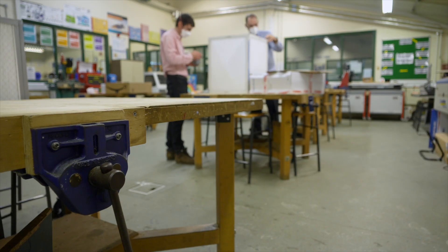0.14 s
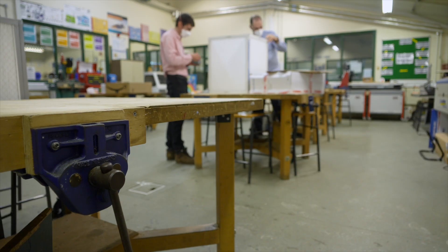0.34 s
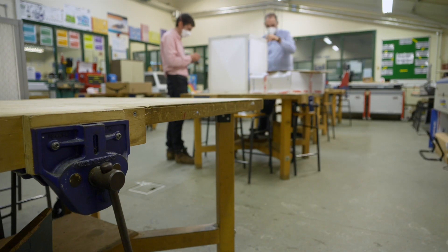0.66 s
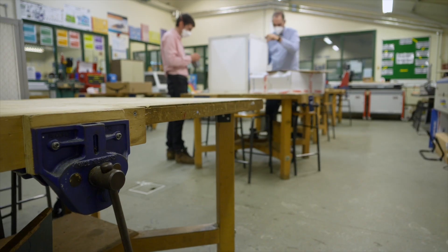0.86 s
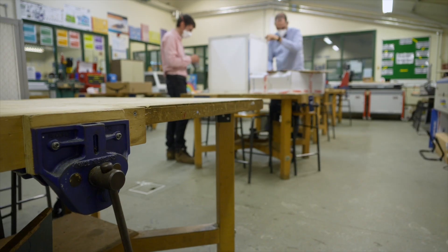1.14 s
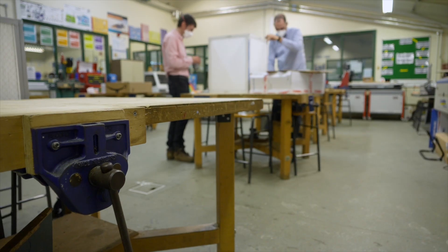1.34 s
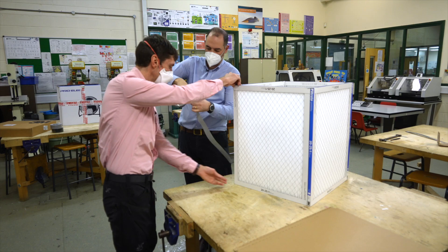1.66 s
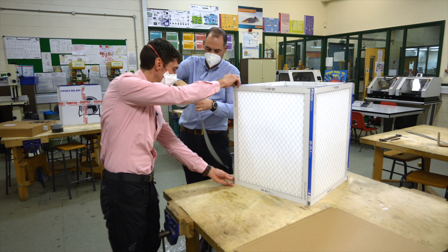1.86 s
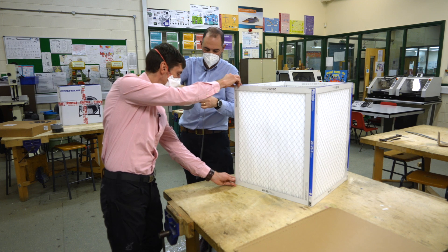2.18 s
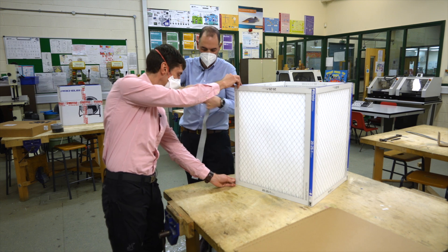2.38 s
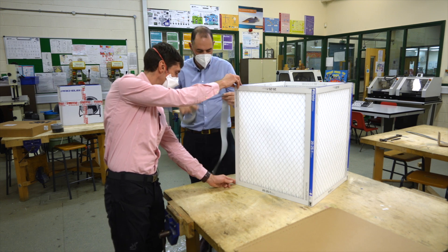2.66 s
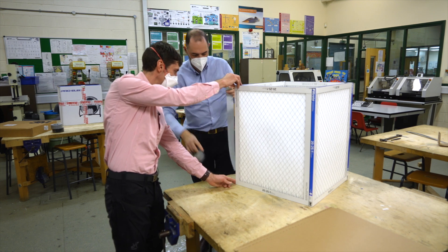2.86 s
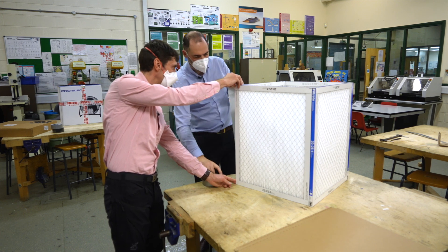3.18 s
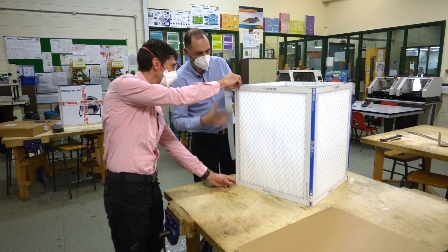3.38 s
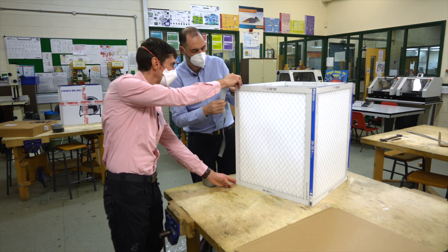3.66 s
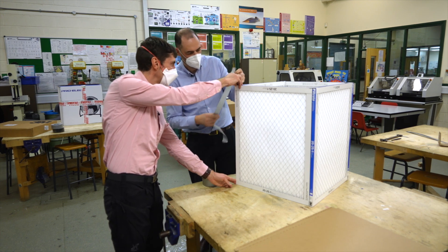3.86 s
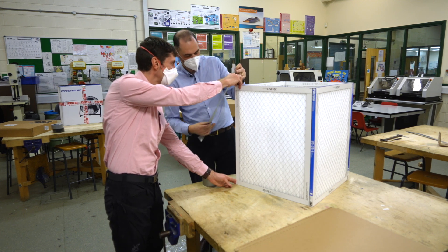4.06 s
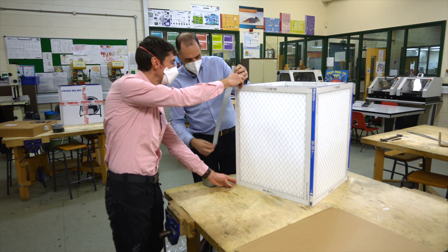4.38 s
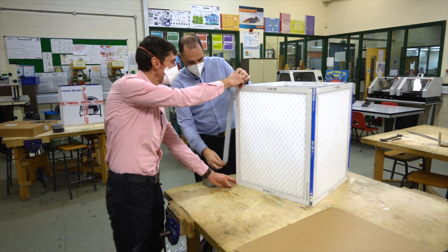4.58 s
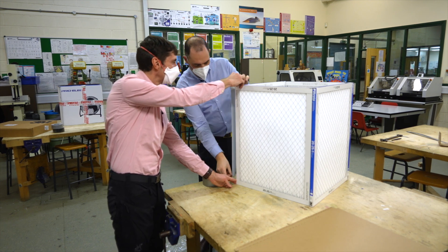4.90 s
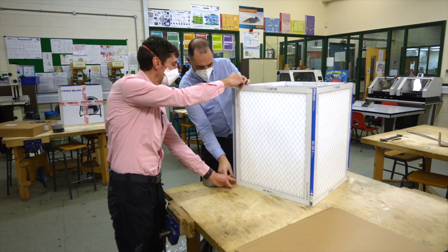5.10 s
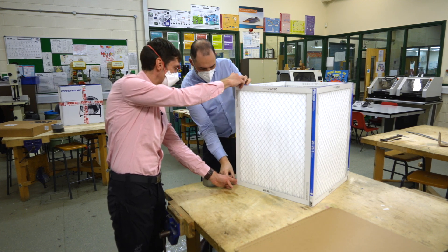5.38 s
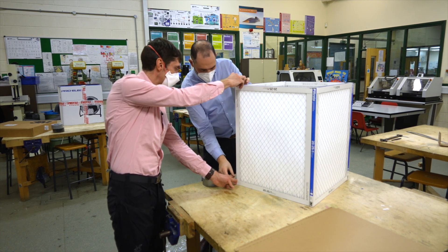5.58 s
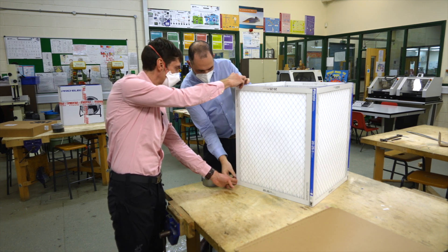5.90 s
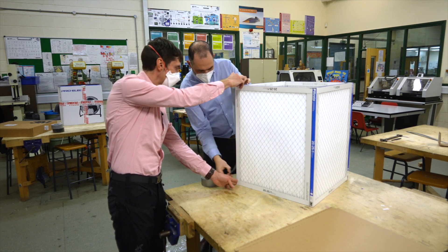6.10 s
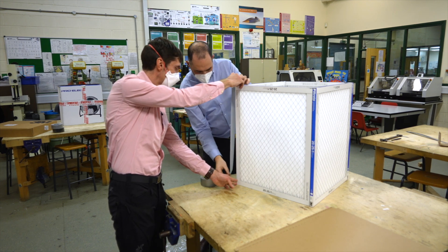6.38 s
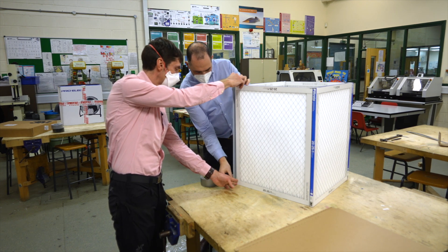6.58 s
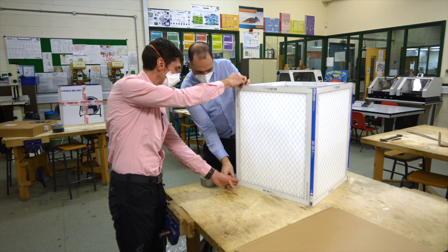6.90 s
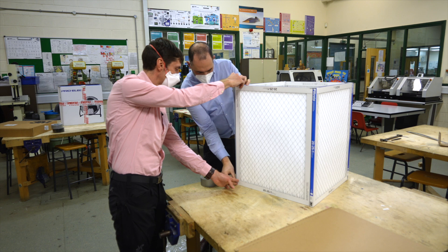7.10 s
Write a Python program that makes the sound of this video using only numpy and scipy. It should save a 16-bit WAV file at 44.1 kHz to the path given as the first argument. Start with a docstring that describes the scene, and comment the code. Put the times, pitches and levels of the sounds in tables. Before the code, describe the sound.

A quiet, hard-walled workshop with a faint low hush, miked close to hands handling wide adhesive tape. From 0.1 to 0.3 s the glue crackles finely, with bright snaps around 0.3; soft rustling and isolated ticks continue to 2.3. At about 2.45 a very short, loud rip cracks out with a low thump and rings into the room, followed by crinkling. Around 3.2 a light cardboard frame raps the bench in a rapid, hollow clatter lasting a tenth of a second. From 3.6 to 4.6 come strong ringing snaps, a brief hissing peel near 3.9, a thump at 4.2 and finger scrapes with sleeve rub. Small ticks cluster around 5.0, with a faint stuttering tear at 5.6. A sharper double rip comes at 6.1, then a dull soft knock at 6.3, and sparse tiny crackles thin out to quiet after 7.

```python
"""Wide cloth tape is peeled off a roll, torn and pressed on a cardboard frame in a hard-walled workshop.
The tape snaps, ticks and tears in fast runs of slips, made of ringing clicks and noise over short low thumps.
Fingers scrape the tape and sleeves rustle close to the microphone: filtered grains and noise.
The frame knocks on the bench as a set of decaying modes. Decaying noise gives the echo, over a quiet room."""
import sys
import numpy as np
from scipy import signal
from scipy.io import wavfile

SR = 44100
rng = np.random.default_rng(int(sys.argv[2]) if len(sys.argv) > 2 else 0)


def wav_out(sig):
    """Save sig, one row per channel (or a flat mono array), as 16-bit PCM at SR to the path in sys.argv[1]."""
    wavfile.write(sys.argv[1], SR, np.round(np.clip(np.atleast_2d(sig).T, -1, 1) * 32767).astype(np.int16))


N = 319592


def amp(db):
    """Decibels to gain."""
    return 10 ** (np.asarray(db) / 20)


def rms_one(x):
    """Scale to unit power."""
    return x / np.sqrt(np.mean(x ** 2) + 1e-20)


def in_time(rows):
    """Interpolate the columns of a curve at every sample; the first column is the time."""
    s, *columns = np.transpose(rows)
    return [np.interp(np.arange(N) / SR, s, c) for c in columns]


def at_hz(points, hz):
    """Interpolate a table over log frequency."""
    table_hz, values = np.array(points).T
    return np.interp(np.log(hz), np.log(table_hz), values)


def bandpass(x, low_hz, high_hz):
    """Second-order Butterworth band."""
    return signal.sosfilt(signal.butter(2, [low_hz, high_hz], "band", fs=SR, output="sos"), x)


def drift(rate_hz):
    """Random wander of mean power 1: noise through a double pole, drawn every 40 samples."""
    r = np.exp(-80 * np.pi * rate_hz / SR)
    noise = rng.standard_normal(N // 40 + 2002)
    slow = signal.lfilter([1], [1, -2 * r, r * r], noise)[2000:]
    return np.interp(np.arange(N) / 40, np.arange(len(slow)), rms_one(slow))


def coloured(x, spectrum, patchy_db=0):
    """Third-octave filter bank: each band has the gain of the spectrum and may wander on its own."""
    edges_hz = 20 * 2 ** np.arange(0, 10.1, 1 / 3)
    out = 0
    for k, (low_hz, high_hz) in enumerate(zip(edges_hz, edges_hz[1:])):
        db = at_hz(spectrum, np.sqrt(low_hz * high_hz))
        if db > -45:
            wander_db = patchy_db * drift(11) if patchy_db else 0
            out = out + (-1) ** k * amp(db + wander_db) * bandpass(x, low_hz, high_hz)
    return out


def ring(clicks, hz, t60_s):
    """Two-pole resonator: a unit click starts a decaying sine of height 1."""
    r, w = amp(-60 / (t60_s * SR)), 2 * np.pi * hz / SR
    return signal.lfilter([0, np.sin(w)], [1, -2 * r * np.cos(w), r * r], clicks + 1e-18)


def grains(per_s, spread_db):
    """Random clicks of uneven size and either sign; rms 1."""
    sizes = amp(spread_db * np.minimum(rng.exponential(1, N), 4)) * rng.choice([-1, 1], N)
    return rms_one(sizes * (rng.random(N) < per_s / SR))


def gesture(t, length_s, attack_s, fade_db_per_s):
    """Gain that rises, holds until length_s and then fades by so many dB a second."""
    return np.clip(t / attack_s, 0, 1) * amp(-fade_db_per_s * np.clip(t - length_s, 0, 1))


def add(out, s, sound):
    """Mix a short sound in at a time."""
    i = round(s * SR)
    out[i:i + len(sound)] += sound[:N - i]


# Single snaps of tape, and the first hard taps of the frame (at 3.17 and 3.175 s).
# Each row: start in seconds, ring peak in dB, ring in Hz, crack peak in dB.
SNAPS = [(0.246, -32, 1500, -40), (0.262, -26, 3520, -31.5), (0.307, -24, 2930, -23.5),
         (0.55, -34.5, 1220, -69), (0.738, -37.5, 2330, -49), (1.352, -45, 1210, -42.5),
         (1.692, -36, 1200, -56), (1.822, -28.5, 1850, -28.5), (2.102, -29, 1450, -27),
         (2.175, -27.5, 1450, -58), (2.341, -58.5, 9220, -38), (2.357, -32.5, 1330, -25.5),
         (2.42, -28.5, 2420, -25.5), (2.667, -33, 350, -23), (3.051, -26, 2940, -32),
         (3.102, -31, 1324, -40), (3.17, -17, 2060, -33), (3.175, -20.5, 1265, -26),
         (3.185, -17, 1150, -39), (3.204, -21.5, 1490, -54.5), (3.22, -60, 9000, -39),
         (3.601, -16, 4320, -29.5), (3.63, -29.5, 1860, -35), (3.707, -26.5, 1560, -24),
         (3.722, -28.5, 1330, -29.5), (4.095, -16.5, 3920, -48), (4.179, -22.5, 1080, -38),
         (4.359, -17.5, 2310, -35.5), (4.393, -33, 2940, -36.5), (4.442, -22, 4430, -23.5),
         (4.458, -23, 4700, -23), (4.578, -24.5, 1730, -32), (4.609, -31.5, 1510, -38),
         (4.719, -38.5, 853, -36.5), (4.911, -27, 1884, -34), (4.955, -34, 2190, -40),
         (4.961, -35, 1505, -51), (4.968, -35.5, 2107, -51), (4.974, -33.5, 1880, -47),
         (4.983, -37, 1700, -52.5), (5, -35.5, 1010, -53), (5.013, -41, 2200, -53),
         (5.101, -40.5, 2300, -62), (5.305, -25, 3000, -32.5), (5.578, -33, 4350, -41),
         (6.03, -33, 1140, -49), (6.076, -31.5, 1410, -35.5), (6.599, -40, 1800, -40.5),
         (6.634, -60, 5960, -47), (6.803, -50.5, 934, -42), (7.032, -65.5, 4940, -40.5),
         (7.073, -64, 6020, -42), (7.228, -58, 6000, -52)]


def snaps():
    """Each snap or tap: a resonance rings a few cycles under a bright crack."""
    out, t = np.zeros(N), np.arange(1400) / SR
    shape = (1 - np.exp(-t / 0.0003)) * (np.exp(-t / 0.002) + 0.044 * np.exp(-t / 0.011))
    click = -6.0 * (np.arange(len(t)) == 30)   # a click about 0.7 ms into the burst
    noises = rng.standard_normal((len(SNAPS), 2, len(t)))
    for (s, db, hz, crack_db), noise in zip(SNAPS, noises):
        body = ring(noise[0] * shape + click, hz, 2.7 / hz)
        crack = bandpass(noise[1] * shape, 4500, 13000)
        snap = amp(db) * body / np.abs(body).max() + amp(crack_db) * crack / np.abs(crack).max()
        add(out, s + 0.00046, snap)
    return out


# Tugs that tear or peel fast. Each row: start in seconds, length in seconds, level in dB, ring in Hz,
# ring share of the power 0-1, echo in dB relative to the near level.
TUGS = [(2.434, 0.014, -42, 2800, 0, -1), (2.442, 0.016, -17.5, 3120, 0.54, -16),
        (2.458, 0.015, -21, 2130, 0, -10), (5.593, 0.041, -39.5, 2410, 0.01, -23.5),
        (5.638, 0.016, -46, 2580, 0, -7), (6.08, 0.018, -42.5, 1510, 0.2, -20.5),
        (6.099, 0.015, -27.5, 1427, 0.6, -16.5), (6.11, 0.005, -19.5, 1495, .8, -24),
        (6.115, 0.0095, -21, 1672, 0.62, -17), (6.123, 0.035, -37.5, 1730, 0.06, -30.5),
        (6.148, 0.042, -34, 3740, 0.25, -17.5), (6.19, 0.018, -37, 1770, 0.04, -15),
        (6.208, 0.012, -33.5, 4140, 0.3, -32)]
TUG_ATTACK_S, TUG_FADE_DB_PER_S = 0.008, 4001.5
# Strongest slips inside the tears. Each row: start in seconds, level in dB.
SLIPS = [(2.47, -16), (5.6072, -27), (5.6126, -32), (5.623, -26.5), (5.63, -32), (6.0966, -24.5),
         (6.101, -26.5), (6.142, -26.5), (6.172, -25.5), (6.177, -32)]
# Spectrum of the tears. Each row: frequency in Hz, density in dB per Hz.
TEAR_COLOUR = [(180, -46.5), (300, -14.5), (1100, -3), (2170, -3.5), (2980, -5.5), (5520, -5.5),
               (12100, -6), (16000, -24)]


def tears():
    """Dense, bunched slips of the glue line ring the free tape; returns near sound and room feed."""
    near, thrown, bursts = np.zeros(N), np.zeros(N), np.zeros(N)
    t = np.arange(500) / SR
    for s, db in SLIPS:
        add(bursts, s, amp(db) * np.exp(-t / 0.0014))
    source = grains(per_s=15000, spread_db=1.0)
    broad = rms_one(coloured(source, TEAR_COLOUR))
    click = 1. * (np.arange(4000) == 0)
    puff = rms_one(coloured(click, TEAR_COLOUR))
    bunching = amp(2.8 * drift(200))
    for s, length_s, db, hz, share, echo_db in TUGS:
        start = round(s * SR)
        span = slice(start, start + round(length_s * SR) + 900)   # 900 samples for the fade
        slips = source[start - 900:span.stop]   # run-in, so that the ring is already going
        tone = rms_one(ring(slips, hz, 25.0 / hz))
        tone = tone + 0.4 * rms_one(ring(slips, 2.1 * hz, 27.0 / hz))
        tone = tone + 0.11 * rms_one(ring(slips, 0.56 * hz, 30.0 / hz))
        t_tug = np.arange(span.stop - start) / SR
        shape = gesture(t_tug, length_s, TUG_ATTACK_S, TUG_FADE_DB_PER_S)
        level = shape * (amp(db) * bunching[span] + bursts[span])
        tone_gain, broad_gain = np.sqrt(share), np.sqrt(1 - share)
        near[span] += level * (tone_gain * tone[900:] + broad_gain * broad[span])
        # from afar a tug is one puff; high rings die sooner
        far_t60_s = min(90.0, 90.0 * (1750 / hz) ** 3) / hz
        far = tone_gain * rms_one(ring(click, hz, far_t60_s)) + broad_gain * puff
        near_rms = np.sqrt(np.sum(level ** 2) / len(click))   # spread over the length of the puff
        add(thrown, s + length_s / 2, amp(echo_db) * near_rms * far)
    return near, thrown


# Low thumps under some of the snaps and the first tear. Each row: start in seconds,
# push in dB before the high-pass, rise time in seconds.
BUMPS = [(0.312, -29.5, 0.00037), (0.562, -41, 0.0027), (0.81, -38.5, 0.001), (1.365, -40, 0.00075),
         (2.455, -17.5, 0.0013), (3.054, -37, 0.0011), (3.619, -32, 0.007), (3.724, -37, 0.0013),
         (4.096, -30, 0.00025), (4.176, -16, 0.000051), (4.181, -20.5, 0.0004), (4.442, -27, 0.00051),
         (5.304, -42.5, 0.00061), (6.297, -37, 0.0038)]


def thumps():
    """A one-sided pressure push; a gentle high-pass lets it swing slowly back."""
    out, t = np.zeros(N), np.arange(2600) / SR
    for s, db, rise_s in BUMPS:
        push = t / rise_s * np.exp(1 - t / rise_s)
        add(out, s, -amp(db) * signal.lfilter([1, -1], [1, -.993], push))
    return out


# Tape drawn slowly off the roll. Each row: time in seconds, level in dB, upper band centre in Hz.
PEEL = [(3.76, -73, 3276), (3.8, -55, 3110), (3.845, -52.5, 3073), (3.868, -64, 3320), (3.904, -46, 4000),
        (3.951, -52, 3800), (3.989, -47, 4210), (4.045, -48.5, 4000), (4.075, -56, 3800)]
PEEL_WIDTH_HZ, LOWER_BAND_RATIO, LOWER_BAND_DB = 1000, .63, -3


def peel():
    """Dense slips make the free tape hiss in two bands whose centres follow the pull."""
    db, hz = in_time(PEEL)
    slips = [grains(per_s=2400, spread_db=0.0) for _ in range(4)]
    lowpass = signal.butter(2, PEEL_WIDTH_HZ / 2, fs=SR, output="sos")
    narrow = signal.sosfilt(lowpass, slips)
    # a slow pair of noises on cosine and sine makes a band around the carrier
    phase = 2 * np.pi * np.cumsum(hz) / SR
    low_phase = LOWER_BAND_RATIO * phase
    upper = narrow[0] * np.cos(phase) + narrow[1] * np.sin(phase)
    lower = narrow[2] * np.cos(low_phase) + narrow[3] * np.sin(low_phase)
    hiss = rms_one(upper + amp(LOWER_BAND_DB) * lower)
    pulling = np.interp(np.arange(N) / SR, [PEEL[0][0], PEEL[-1][0]], [1, 1], left=0, right=0)
    return amp(db) * pulling * amp(2.6 * drift(61)) * hiss


# Glue letting go thread by thread. Each row: start in seconds, length in seconds, ticks per second,
# base tick peak in dB (each tick lies 3.5 below to 10.5 above).
CRACKLE = [(0.088, .22, 143, -41), (0.616, .13, 32, -46), (3.53, .06, 70, -42.5), (5.199, .35, 17.3, -52.5),
           (6.501, .18, 42, -49), (7.066, .18, 24, -57)]
TICK_LOW_HZ, TICK_HIGH_HZ = 4000, 14000


def crackle():
    """Ticks at random moments, at most 30 a spell: noise bursts ringing briefly at their own pitch."""
    out, t = np.zeros(N), np.arange(300) / SR
    for s, length_s, per_s, db in CRACKLE:
        draws, noise = rng.random((30, 3)), rng.standard_normal((30, 300))
        times = s - np.cumsum(np.log(draws[:, 0])) / per_s
        for at, (_, pitch, size), burst in zip(times, draws, noise):
            if at < s + length_s:
                hz = TICK_LOW_HZ * (TICK_HIGH_HZ / TICK_LOW_HZ) ** pitch
                tick = ring(np.diff(burst * np.exp(-t / 0.00025)), hz, 1.8 / hz)
                add(out, at, amp(db + 14 * size - 3.5) * tick / np.abs(tick).max())
    return out


# Fingers sliding along the tape. Each row: start in seconds, length in seconds, scrape in dB, crinkle in dB.
STROKES = [(-.02, 0.86, -67.5, -68), (0.106, 0.058, -62, -63), (0.217, 0.085, -55.5, -56),
           (1.2, 0.12, -68.5, -70), (1.648, 0.35, -61, -63), (2.093, 0.054, -71, -52),
           (2.2, 0.16, -65.5, -66), (2.353, 0.25, -64, -48), (2.67, 0.032, -62, -55),
           (2.747, 0.13, -59.5, -62), (3.069, 0.066, -53.5, -58.5), (3.55, 0.13, -58.5, -63),
           (3.706, 0.063, -46.5, -61), (3.797, 0.29, -56, -55.5), (4.145, 0.2, -52, -59.5),
           (4.472, 0.036, -53.5, -56), (4.995, 1.7, -75, -85)]
STROKE_ATTACK_S, STROKE_FADE_DB_PER_S = 0.019, 144
RESTING_SCRAPE_DB, RESTING_CRINKLE_DB = -83.5, -73.5   # hands lying on the tape


def strokes():
    """Gains of scrape and crinkle: all strokes and the resting hands, added in power."""
    t = np.arange(0, N + 40, 40) / SR
    power = amp([[RESTING_SCRAPE_DB], [RESTING_CRINKLE_DB]]) ** 2
    for s, length_s, *db in STROKES:
        shape = gesture(t - s, length_s, STROKE_ATTACK_S, STROKE_FADE_DB_PER_S)
        power = power + (amp(db)[:, None] * shape) ** 2
    return [np.interp(np.arange(N) / SR, t, gain) for gain in np.sqrt(power)]


# Spectra of scrape and crinkle. Each row: frequency in Hz, density in dB per Hz.
SCRAPE = [(800, -12.5), (1600, -12), (2600, -9), (4000, -9.5), (6000, -15), (10000, -26)]
CRINKLE = [(3500, -24.5), (5500, -8.5), (7500, -2.5), (10500, -2), (13000, -3), (16000, -20)]


def fingers():
    """Fingers scrape the tape, which crinkles in fine grains."""
    scraping, crinkling = strokes()
    grip = amp(2.2 * drift(28))   # one grip shakes scrape and crinkle together
    scrape = rms_one(coloured(grains(per_s=6000, spread_db=2.5), SCRAPE, patchy_db=2.2))
    crinkle = rms_one(coloured(grains(per_s=23000, spread_db=6.0), CRINKLE, patchy_db=1.0))
    return (scrape * scraping + crinkle * crinkling) * grip


# Sleeves and hands moving. Each row: time in seconds, rumble in dB, rub in dB.
RUSTLE = [(0, -55, -59), (.12, -57.5, -64), (.45, -62.5, -64.5), (1.05, -69, -64.5), (1.38, -60.5, -64),
          (1.75, -56, -63), (2.1, -71.5, -61), (2.4, -57.5, -58.5), (2.95, -66, -67), (3.3, -59, -55),
          (3.75, -63.5, -68), (4.3, -59, -52.5), (4.55, -63, -55.5), (4.9, -61.5, -62.5), (5.4, -68.5, -60),
          (5.95, -69.5, -65.5), (6.3, -53.5, -59), (6.9, -80.5, -73), (7.25, -69.5, -71)]
# Spectra of rumble and rub. Each row: frequency in Hz, density in dB per Hz.
RUMBLE = [(12, -42), (20, -14), (54, 4.5), (92, 1.5), (296, -11.5), (460, -34), (770, -120)]
RUB = [(120, -27.5), (200, 2), (500, 3.5), (1920, -6.5), (4030, -18.5), (5000, -13), (6500, -28),
       (11000, -120)]


def rustle():
    """Moving sleeves rumble as low noise; hands rub as patchy grains."""
    rumble_db, rub_db = in_time(RUSTLE)
    rumble = rms_one(coloured(rng.standard_normal(N), RUMBLE))
    rub = rms_one(coloured(grains(per_s=4800, spread_db=3.0), RUB, patchy_db=2.5))
    return rumble * amp(rumble_db + 2.0 * drift(4.6)) + rub * amp(rub_db + 2.1 * drift(23))


# Frame on the bench. Each row: start in seconds, blow in dB, contact hardness in Hz.
KNOCKS = [(3.186, -23, 916), (3.203, -25.5, 1200), (3.23, -25.5, 900), (3.241, -23, 794),
          (3.25, -25.5, 600), (3.275, -28.5, 420), (3.29, -32, 500), (4.861, -40.5, 249), (6.271, -38, 910)]
# Modes of the frame. Each row: frequency in Hz, level in dB, t60 in seconds.
FRAME = [(103, -28, 0.22), (167.2, -3.5, 0.12), (302, -2.5, 0.041), (402, -15.5, 0.093), (495, -9, 0.049),
         (617, -5, 0.06), (730, -5.5, 0.042), (865, -9, 0.063), (1070, -6, 0.032), (1420, 4, 0.0091)]


def knocks():
    """Each blow strikes every mode with its own strength; a softer contact reaches fewer high modes."""
    out = np.zeros(N)
    start_s, blow_db, hardness_hz = np.array(KNOCKS).T
    at = (start_s * SR).astype(int)
    luck_db = rng.normal(0, 2.0, (len(KNOCKS), len(FRAME)))
    for k, (hz, level_db, t60_s) in enumerate(FRAME):
        clicks = np.zeros(N)
        clicks[at] = amp(blow_db + level_db + luck_db[:, k]) / (1 + (hz / hardness_hz) ** 2)
        out += (-1) ** (k // 2) * ring(clicks, hz, t60_s)
    return out


# Decay of the workshop. Each row: frequency in Hz, t60 in seconds.
ROOM_T60 = [(100, 0.17), (500, 1.4), (2000, 1), (6000, 1.15), (15000, 0.28)]


def workshop(x):
    """Diffuse echo: convolution with noise that dies band by band."""
    t = np.arange(SR * 3 // 2) / SR
    edges_hz = 60 * 2 ** np.arange(0, 8.3, .75)
    echo = np.zeros(len(t))
    for low_hz, high_hz in zip(edges_hz, edges_hz[1:]):
        t60_s = at_hz(ROOM_T60, np.sqrt(low_hz * high_hz))
        echo += bandpass(rng.standard_normal(len(t)), low_hz, high_hz) * amp(-60 * t / t60_s)
    echo *= np.clip(t / 0.012, 0, 1)   # the first walls are some metres off
    return signal.fftconvolve(x, echo / np.sqrt(np.sum(echo ** 2)))[:N]


# Spectrum of the quiet room. Each row: frequency in Hz, density in dB per Hz.
FLOOR = [(15, -35), (25, 0.5), (70, 19.5), (180, -6.5), (1230, -8.5), (1400, -14.5), (3430, -22.5),
         (12200, -25.5), (16000, -44.5)]
FLOOR_DB = -74.5


def hush():
    """The room's steady hush: coloured noise at one level."""
    return amp(FLOOR_DB) * rms_one(coloured(rng.standard_normal(N), FLOOR))


def scene():
    """Near sounds, their echo, and the room's steady hush."""
    snap, (tear, thrown), knock = snaps(), tears(), knocks()
    echo = workshop(amp(-14.5) * snap + thrown + amp(-12) * knock)
    tape = snap + tear + thumps() + peel() + crackle()
    handling = fingers() + rustle()
    return (tape + handling + knock + echo + hush())[None]


def record(dry):
    """Steep low-pass: the top is cut, 60 dB down from 16480 Hz."""
    return signal.sosfilt(signal.cheby2(12, 60, 16480, fs=SR, output="sos"), dry)


dry = scene()
out = record(dry)
wav_out(out)
```